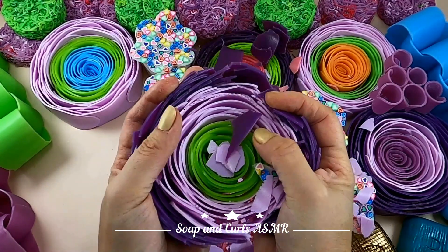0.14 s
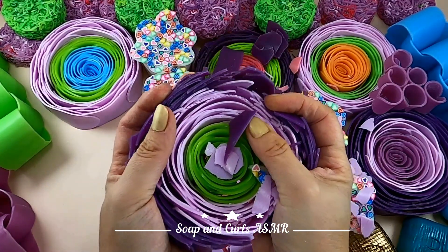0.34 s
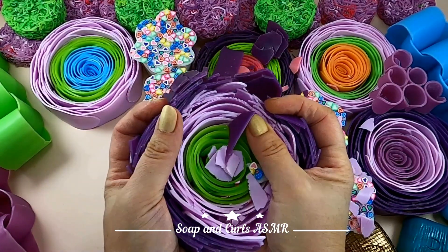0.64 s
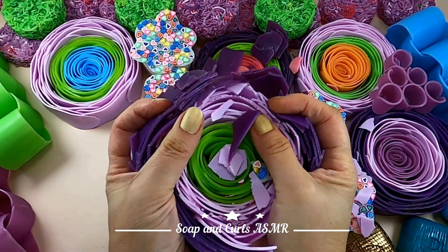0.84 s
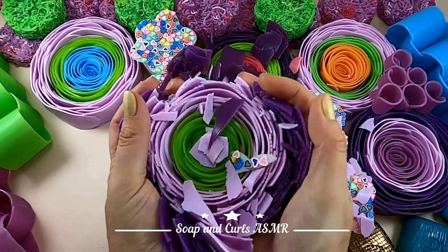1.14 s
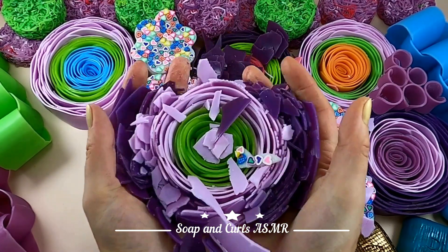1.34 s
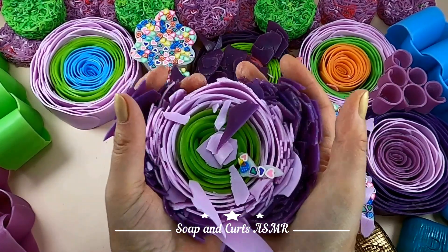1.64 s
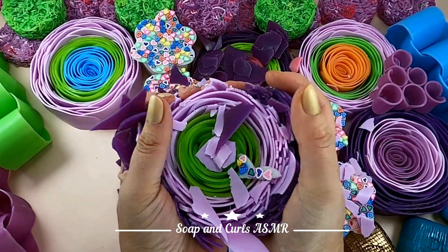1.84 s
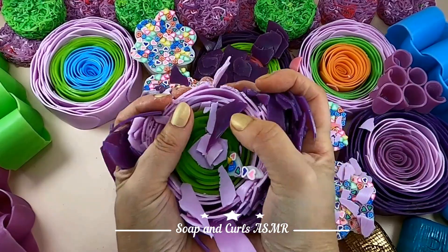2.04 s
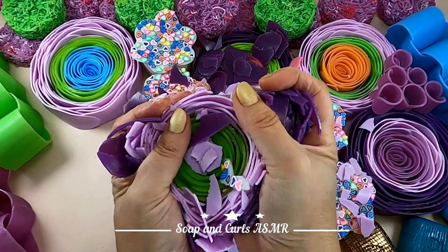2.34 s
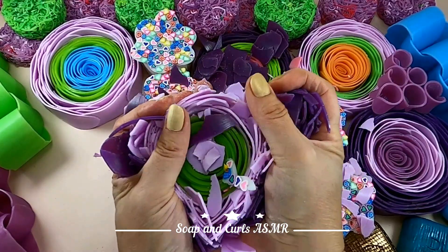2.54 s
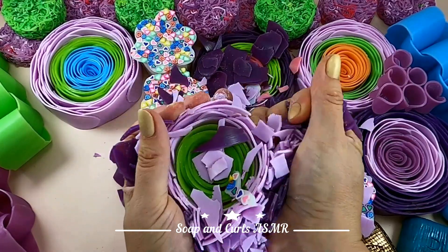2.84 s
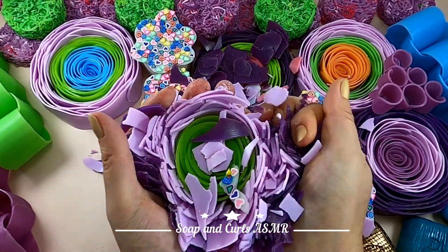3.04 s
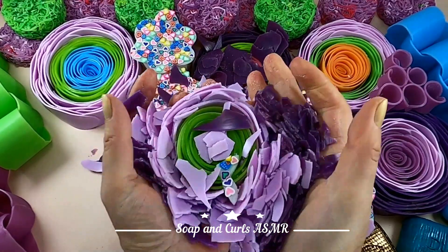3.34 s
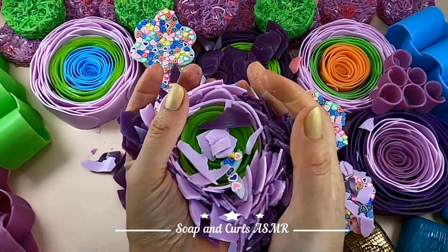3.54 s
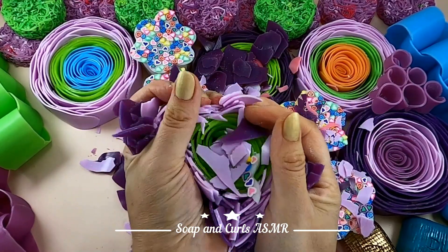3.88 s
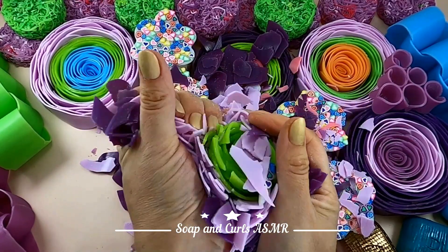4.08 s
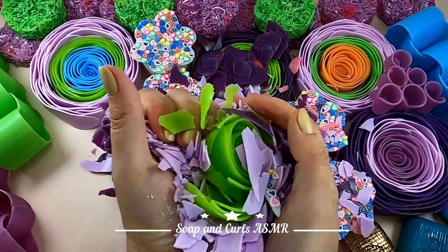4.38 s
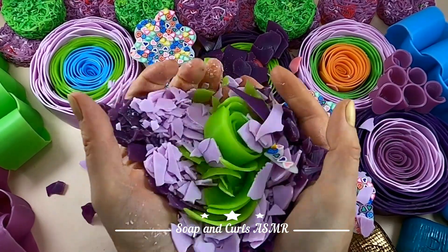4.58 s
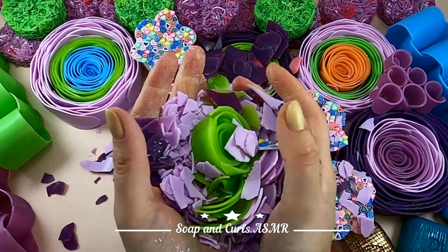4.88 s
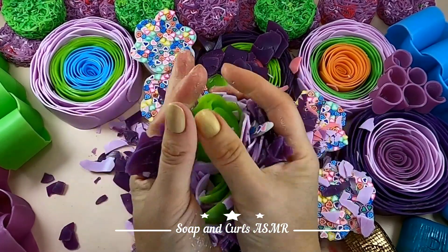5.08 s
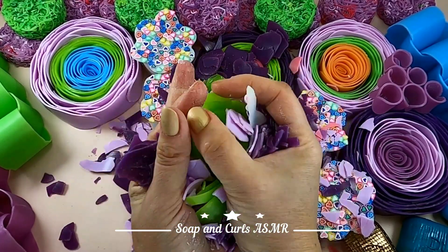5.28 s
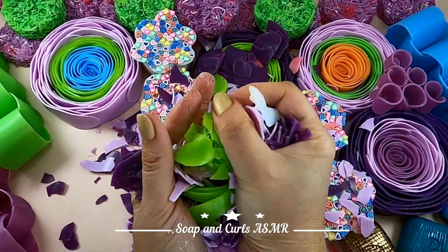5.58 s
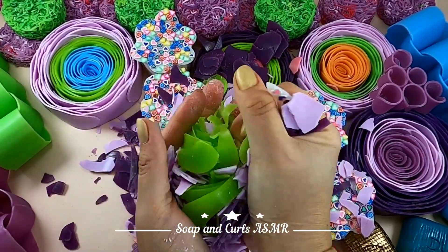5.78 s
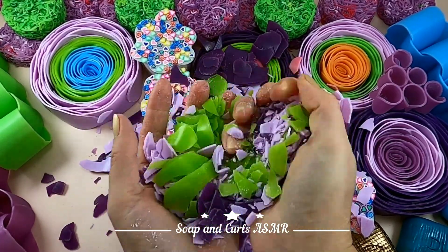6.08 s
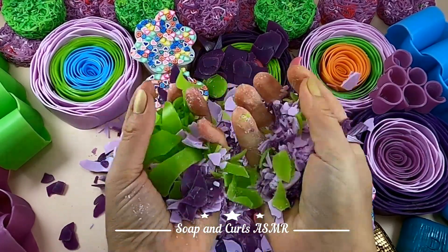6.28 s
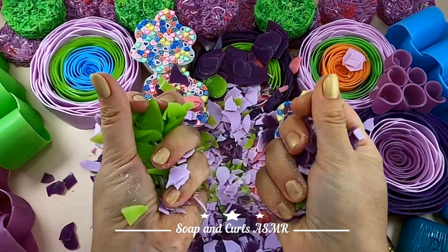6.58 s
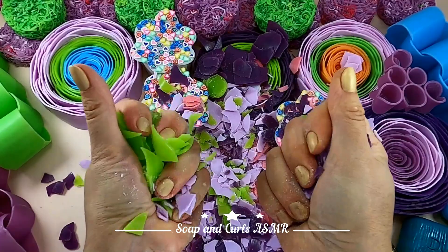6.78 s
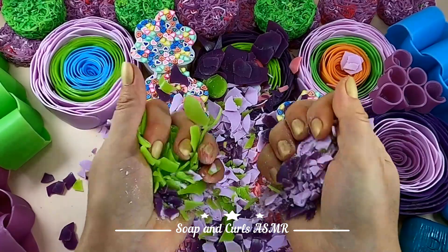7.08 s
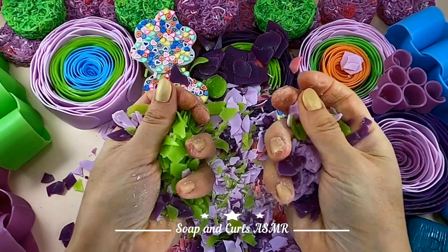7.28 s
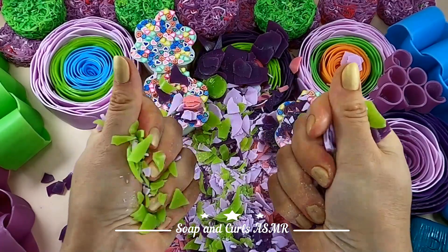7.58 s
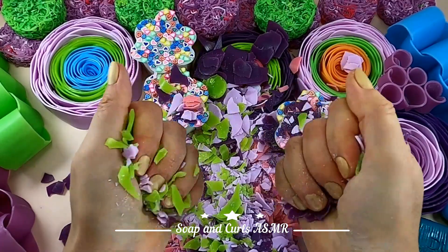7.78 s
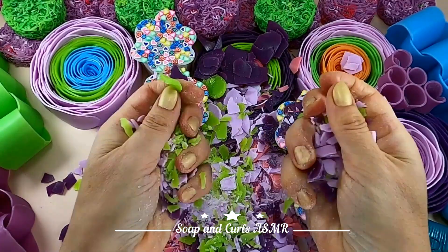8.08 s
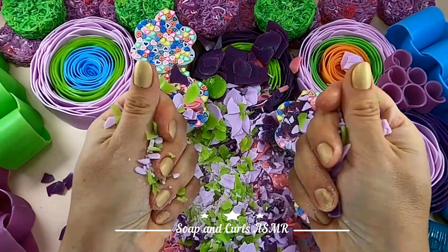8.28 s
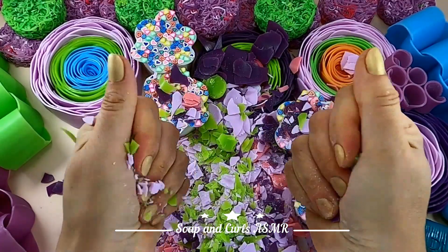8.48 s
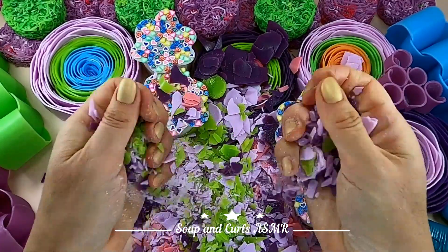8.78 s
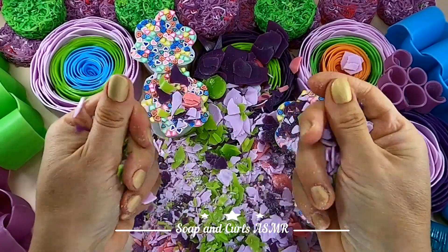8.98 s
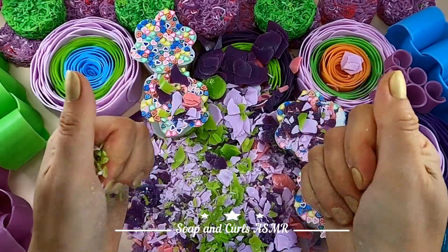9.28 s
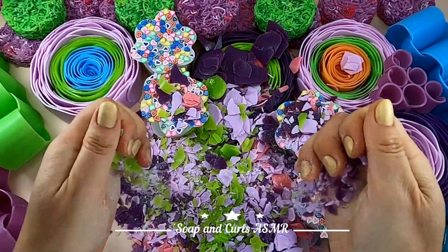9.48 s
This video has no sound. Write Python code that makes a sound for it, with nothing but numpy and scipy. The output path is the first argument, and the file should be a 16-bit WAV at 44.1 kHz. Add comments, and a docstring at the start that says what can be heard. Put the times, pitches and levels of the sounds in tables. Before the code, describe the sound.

Bare hands squeeze brittle soap shells right at the microphone. It starts at once with loud crisp cracks, continues as crunchy pulses with brief lulls, and spills of flakes patter and tap woodenly on the tabletop. After further strong bursts, thicker pieces give lower, woody cracks; the crunching then dwindles to light crumbling and a few ticks. Short dry room reflections, wide stereo detail, soft steady background hiss.

```python
"""From the start two hands crush a rose of dry soap curls close to a stereo microphone: thin shells snap
one by one as damped resonators, over a crackle of random tiny fractures. As the grip opens, loose flakes
clatter and knock on the table, whose modes ring on. Later, runs of woody cracks come from the thick curls,
and the work thins out and fades. Throughout, a small room answers by decaying echoes over quiet shaped hiss."""
import sys
import numpy as np
from scipy import signal
from scipy.fft import rfft, irfft
from scipy.io import wavfile
from scipy.ndimage import uniform_filter1d, minimum_filter1d

SR = 44100
rng = np.random.default_rng(int(sys.argv[2]) if len(sys.argv) > 2 else 0)


def dump_mix(stems):
    """Bounce the given channels to the path in sys.argv[1] as a 16-bit WAV at rate SR."""
    frames = np.atleast_2d(stems).T  # one column per channel
    limited = np.clip(frames, -1, 1)  # hard clip at full scale
    pcm = np.round(limited * 32767).astype(np.int16)
    wavfile.write(sys.argv[1], SR, pcm)


N = 424683
TIME = np.arange(N) / SR
TAPS = 1024  # length of one piece's sound, samples
HZ = np.fft.rfftfreq(TAPS, 1 / SR) + 1  # 1 Hz up, so that no ratio divides by zero
MS = SR / 1000  # samples in a millisecond


def amp(db):
    """Level to amplitude: 20 dB is a factor of ten."""
    return 10 ** (np.asarray(db) / 20)


def power_db(power):
    """Power to level: 10 dB is a factor of ten."""
    return 10 * np.log10(power)


def read(points, hz):
    """Interpolates a spectrum table on a logarithmic frequency axis."""
    f, value = np.transpose(points)
    return np.interp(np.log(hz + 1), np.log(f), value)


def unit(x):
    """Energy normalisation: a stereo sound gets mean energy 1 a channel."""
    return x / np.sqrt(np.sum(x ** 2) / 2 + 1e-20)


def add(mix, s, sound):
    """Superposition: mixes a sound in at time s."""
    part = mix[:, max(round(s * SR), 0):][:, :sound.shape[1]]
    part += sound[:, :part.shape[1]]


def causal(points):
    """Minimum phase: the response of this colour that starts sharply and rings afterwards."""
    log_gain = np.log(amp(read(points, HZ)))
    circle = np.concatenate([log_gain, log_gain[-2:0:-1]])
    return np.exp(np.conj(signal.hilbert(circle)))[:len(HZ)]


def ports(a, b, alike_hz, most=0.72):
    """Diffuse-field coherence: two close ports hear alike in the bass and differently in the treble."""
    alike = most / (1 + (np.fft.rfftfreq(len(a), 1 / SR) / alike_hz) ** 2)
    mid = rfft(a) * np.sqrt(1 + alike)
    side = rfft(b) * np.sqrt(1 - alike)
    return irfft(np.array([mid + side, mid - side]), len(a))


# still air and microphone hiss: f/Hz, relative level/dB
AIR_SPECTRUM = [(15, -4), (40, -29), (230, -24.5), (400, -7.5), (1000, -5), (3000, -2), (8000, -8.5),
                (16000, -22)]


def air():
    """Stationary noise floor of room and microphone: white noise shaped by a spectrum."""
    noise = rfft(ports(*rng.standard_normal((2, N)), alike_hz=2500, most=0.25))
    shaped = irfft(noise * amp(read(AIR_SPECTRUM, np.fft.rfftfreq(N, 1 / SR))), N)
    return amp(-56.5) * np.sqrt(N) * unit(shaped)


def handling(power):
    """Amplitude modulation: low-passed noise rumbles softly with the work of the hands."""
    low_pass = signal.butter(1, 30, fs=SR, output="sos")
    rumble = signal.sosfilt(low_pass, ports(*rng.standard_normal((2, N)), alike_hz=2500))
    return amp(-53.0) * np.sqrt(N * power) * unit(rumble)


# decay of the late room sound: f/Hz, t60/s
ROOM_DECAY = [(300, 0.063), (1000, 0.49), (4000, 0.3), (9000, 0.16), (16000, 0.018)]


def echoes(tail_db=-12, bass_db=5):
    """Reverberation: quick sparse reflections off nearby things, then a short tail fuller in the bass."""
    early_db, early_s = -14.5, .0055
    size = SR // 2
    t = np.arange(size) / SR
    taps = rng.standard_normal((2, size)) * (rng.random((2, size)) < 4000 / SR)
    early = unit(ports(*taps, alike_hz=4800) * np.exp(-t / early_s) * (t > .002))
    # each band of the tail decays at its own rate
    hz, when, bands = signal.stft(ports(*rng.standard_normal((2, size)), alike_hz=3600), SR, nperseg=256)
    bass_lift_db = bass_db / (1 + (hz[:, None] / 600) ** 2)
    tail_gain = amp(bass_lift_db - 60 * when / read(ROOM_DECAY, hz)[:, None])
    tail = signal.istft(bands * tail_gain, SR, nperseg=256)[1][:, :size]
    return amp(early_db) * early + amp(tail_db) * unit(tail * np.clip(t / 0.00022 - .5, 0, 1))


def room(x, count=4):
    """Time-varying convolution: pieces break at ever different places, so the echo pattern changes."""
    step = SR // 150  # samples from one place to the next
    places = rng.integers(0, count, N // step + 2)
    out = 0
    for k in range(count):
        share = np.interp(np.arange(N) / step, np.arange(len(places)), places == k)
        out = out + signal.oaconvolve(x * np.sin(np.pi / 2 * share), echoes(), axes=1)[:, :N]
    return out


# modes of the table under the heap: f/Hz, relative level at resonance/dB, t60/s
TABLE_MODES = [(306, 2, 0.11), (378, 5, 0.096), (398, 5.5, 0.13), (421.5, 11, 0.22), (504, 8, 0.23),
               (605, 10.5, 0.095), (679.5, 7.5, 0.22), (750, 8.5, 0.19), (1030, 2, 0.0071)]


def table_top(x):
    """Modal resonance: the table rings on as a sum of decaying cosines driven by the sound."""
    t = np.arange(SR // 3) / SR
    ring = np.zeros(len(t))
    for hz, db, t60 in TABLE_MODES:
        even_peak = 2 * np.log(1000) / (t60 * SR)  # makes the resonant gain independent of t60
        ring += amp(db - 60 * t / t60) * np.cos(2 * np.pi * hz * t) * even_peak
    return amp(-3.0) * signal.oaconvolve(x, ring[None], axes=1)[:, :N]


def shell(hz, q, ringing, count=3):
    """Damped resonance: a broad double resonator with a few narrow modes scattered around it."""
    mode_q, rattle = 13, .045
    mode_hz = hz * np.exp(0.25 / max(q, .7) * rng.uniform(-1.203, 1, (count, 1)))
    modes = rng.choice([-1, 1], (count, 1)) / (1 + 1j * mode_q * (HZ / mode_hz - mode_hz / HZ))
    broad = 1 / (1 + 1j * q * (HZ / hz - hz / HZ)) ** 2
    return broad + ringing * modes.sum(0) + rattle


def chip(colour, hz, q, ringing, steps_ms, scatter, scatter_ms, count=7):
    """Multipath: a piece cracks in quick steps, rings, and bounces between fingers and flakes to the ports."""
    pan_db, lag_ms, place_ms, angle_ms = -0.5, 0.037, 0.026, 0.034
    # smaller steps come just before and after the main break, weaker bounces later
    steps = rng.uniform(0, 2 * steps_ms, count)
    bounces = 2 * steps_ms + rng.exponential(scatter_ms, count)
    delay_ms = 0.19 + np.r_[steps_ms, steps, bounces]
    step_size, bounce_size = rng.standard_normal((2, count)) / np.sqrt(count)
    size = np.r_[.58, step_size, scatter * bounce_size]
    # the right port is usually a little nearer; each bounce comes from its own direction
    turn = np.r_[np.zeros(count + 1), angle_ms * rng.standard_normal(count)]
    lag = lag_ms + place_ms * rng.standard_normal() + turn
    arrival_s = (delay_ms + np.array([lag, -lag]) / 2) * MS / SR
    paths = np.sum(size[:, None] * np.exp(-2j * np.pi * arrival_s[..., None] * HZ), 1)
    # only the treble is shaded by the microphone's body, mostly on the left
    shade_db = (pan_db * rng.standard_normal() + 1.5) * np.minimum(HZ / 6200, 1.6) ** 2
    shading = amp(np.array([-shade_db, shade_db]) / 2)
    sound = irfft(colour * shell(hz, q, ringing) * paths * shading)
    return unit(sound * np.clip(np.linspace(4, 0, TAPS), 0, 1))


def chips(low_hz, high_hz, count, colour, **settings):
    """Size sets pitch: a stock of pieces spaced evenly in log frequency."""
    return [chip(colour, hz, **settings) for hz in np.geomspace(low_hz, high_hz, count)]


def shower(pieces, per_s, spread_db, level_db):
    """Poisson process: random small pieces of mixed size; harder work makes them more and louder."""
    power = amp(level_db) ** 2
    rate = per_s * (power / power.mean()) ** .36
    at = np.flatnonzero(rng.random(N) < rate / SR)
    luck, sign, pitch = rng.random((3, N))
    size = amp(spread_db * np.minimum(-np.log(1 - luck[at]), 3.5))
    energy = np.zeros(N)
    energy[at] = size ** 2
    # the work done in each moment is shared among the pieces that break in it
    size *= np.sqrt(power[at] / uniform_filter1d(energy, size=3000)[at]) * np.sign(sign[at] - .5)
    choice = (pitch * len(pieces)).astype(int)
    out = np.zeros((2, N + TAPS))
    for i, a in zip(at, size):
        out[:, i:i + TAPS] += a * pieces[choice[i]]
    return out[:, :N]


def stroke(start, hold, db, swell_db, attack_s, release_db_per_s):
    """Envelope of one gesture's power: linear attack in amplitude, swelling or sagging hold, dB release."""
    t = np.arange(0, hold + .5, 1 / SR)
    level_db = db + swell_db * np.minimum(t / hold, 1) - release_db_per_s * np.maximum(t - hold, 0)
    power = np.zeros((1, N))
    add(power, start, (np.minimum(t / attack_s, 1) * amp(level_db))[None] ** 2)
    return power[0]


# loose flakes spilling from the fingers: start t/s, hold t/s, drive level/dB
SPILLS = [(0.088, 0.047, -38.5), (0.207, .11, -44.5), (1.135, 0.27, -37.5), (1.408, 0.19, -37.5),
          (1.663, 0.08, -38), (1.963, 0.33, -50.5), (2.233, 0.074, -41.5), (2.935, 0.083, -35),
          (3.05, 0.05, -40.5), (3.318, 0.14, -44), (3.457, 0.27, -38), (4.198, 0.22, -48),
          (4.529, 0.065, -37.5), (4.695, 0.19, -40.5), (4.95, 0.77, -48.5), (5.37, 0.4, -46),
          (6.054, 0.055, -36), (6.319, 0.39, -42.5), (6.889, 0.017, -41), (7.143, 0.057, -38.5),
          (7.384, 0.14, -41), (7.582, 0.2, -46), (8.021, 0.13, -44.5), (8.472, 0.049, -46),
          (8.834, 0.24, -49), (9.143, 0.11, -53.5), (9.574, .05, -44)]
TIP_S, SETTLE_DB_PER_S, THINNING_DB = 0.0084, 103.5, -1.5  # a spill starts fast, thins a little, settles
SHED_DB = -27  # flakes shed by crushing, relative to its power
STIR_DB, STIR_DB_PER_S = -31.5, 336  # clatter set off by a knock, relative to its table level; its fall


def spilling(crushed):
    """Power addition: flakes shed by crushing, spilled from the fingers and stirred by knocks."""
    power = amp(SHED_DB) ** 2 * crushed
    for start, hold, db in SPILLS:
        power = power + stroke(start, hold, db, THINNING_DB, TIP_S, SETTLE_DB_PER_S)
    for s, db, _ in KNOCKS:
        power = power + stroke(s, 0.024, db + STIR_DB, 0, 0.0014, STIR_DB_PER_S)
    return power


# colour of a flake landing: f/Hz, relative level/dB
LANDING = [(100, 10), (240, -21), (300, -21), (380, -7), (650, -6), (1000, -0.5), (1350, 0.5), (2500, 15.5),
           (8000, -25)]


def flakes(power, count=50):
    """Impact excitation: loose pieces tap dull and hollow, a few curls ring, and the heap shifts under them."""
    colour, level_db = causal(LANDING), power_db(power)
    pieces = chips(400, 1120, count, colour, q=0.79, ringing=0.59, steps_ms=1.571,
                   scatter=0.79, scatter_ms=1.903)
    curls = chips(760, 1200, count, colour, q=2.65, ringing=0.17, steps_ms=1.07,
                  scatter=0.28, scatter_ms=2.35)
    taps = shower(pieces, per_s=260, spread_db=6.0, level_db=level_db)
    rings = shower(curls, per_s=50, spread_db=0.0, level_db=level_db)
    # the heap answers with its lowest pieces, even to a light touch
    heap = shower(pieces[:count // 3], per_s=560, spread_db=2, level_db=0.84 * level_db)
    return amp(-11.0) * taps + amp(-15.5) * rings + amp(-30.0) * heap


# larger flakes knocking on the heap and the table:
# t/s, relative level/dB (of the energy packed into 1 ms), f/Hz
KNOCKS = [(.090, -25, 744), (.097, -17.5, 754), (0.28, -27.5, 410), (0.4633, -18, 1030), (.65, -23.5, 1043),
          (0.904, -26.5, 1024), (1.139, -20, 930), (1.173, -27, 1010), (1.185, -18.5, 970),
          (1.247, -16, 950), (1.324, -20, 790), (1.418, -12, 760), (1.429, -19.5, 704), (1.441, -24, 734),
          (1.461, -23.5, 790), (1.48, -26, 785), (1.487, -16.5, 834), (1.501, -18.5, 790),
          (1.514, -22, 810), (1.584, -18.5, 1010), (1.6731, -14, 954), (2.444, -24.5, 1014),
          (2.928, -24, 740), (2.947, -31, 600), (2.964, -20.5, 432), (2.985, -19.5, 950), (3.028, -30, 750),
          (3.479, -19, 1000), (3.528, -18.5, 960), (3.568, -28, 1080), (3.609, -24, 830),
          (3.627, -18.5, 900), (3.646, -17.5, 995), (4.585, -20, 920), (4.666, -30, 580),
          (4.855, -19, 1180), (4.856, -26, 450), (5.203, -26, 1030), (5.209, -26, 1180), (5.387, -18, 1030),
          (5.432, -25, 1040), (5.517, -13, 1050), (5.523, -21, 1010), (6.072, -24.5, 595),
          (6.337, -17.5, 1120), (6.345, -23.5, 437), (6.345, -18.5, 940), (6.371, -25, 1080),
          (6.389, -17.5, 974), (6.432, -22, 965), (6.477, -25, 1060), (6.518, -17.5, 983),
          (6.603, -19, 1075), (6.6094, -13.5, 956), (7.158, -30.5, 613), (7.387, -18, 900),
          (7.456, -23.5, 1030), (8.039, -22.5, 927), (8.332, -31, 960), (8.488, -16, 880),
          (8.503, -19, 1150), (8.838, -35.5, 940), (9.355, -31, 1390)]
# knocks near the pitch of the cupped palms ring longer
PALM_HZ, PALM_WIDTH_HZ, DULL_Q, PALM_Q = 1000, 83, 1.54, 3.7


def knocks():
    """Coupled resonance: larger flakes knock one by one, with more Q near the pitch of the palms."""
    out, colour = np.zeros((2, N)), causal(LANDING)
    for s, db, hz in KNOCKS:
        palm = np.exp(-((hz - PALM_HZ) / PALM_WIDTH_HZ) ** 2)
        q = rng.uniform(1.0, 1.32) * (DULL_Q + PALM_Q * palm)
        knock = chip(colour, hz, q, ringing=0.13, steps_ms=0.98, scatter=0.48, scatter_ms=2.277)
        add(out, s - .0015, amp(db - 6.0) * np.sqrt(MS) * knock)
    return out


# colour of a fracture: f/Hz, relative level/dB
FRACTURE = [(150, -63), (350, -35), (700, -14.5), (1000, -4), (1350, -3.5), (1900, 1.5), (4000, 0),
            (7000, 0.5), (8500, -2.5), (12000, -7), (16000, -14)]
# thick curls giving way in a run of woody cracks: start t/s, hold t/s, drive level/dB
THICK_RUNS = [(5.775, .08, -47), (5.888, 0.097, -46.5), (6.9, 0.15, -45.5), (7.674, 0.26, -51)]
PRESS_S, RELAX_DB_PER_S = 0.0025, 134  # a squeeze bites quickly and lets go slowly


def thick_walls(count=40):
    """Higher-Q resonance: thick curls give runs of woody cracks drawn from a narrow band of pitches."""
    pieces = chips(1600, 2080, count, causal(FRACTURE), q=3.0, ringing=0.13, steps_ms=0.48,
                   scatter=0.2, scatter_ms=1.8)
    power = 1e-12
    for start, hold, db in THICK_RUNS:
        power = power + stroke(start, hold, db, 0, PRESS_S, RELAX_DB_PER_S * 2)
    return shower(pieces, per_s=110, spread_db=6, level_db=power_db(power))


def clumps(swing_db=2.5, step_s=0.007):
    """Clustering: one fracture sets off its neighbours, rendered as a quick random swing in dB."""
    return swing_db * np.interp(TIME / step_s, np.arange(4000), rng.standard_normal(4000))


# faint creak of the soap resting in the hands, less as they empty: t/s, drive level/dB
RESTING = [(0, -46), (6.299, -49), (8, -48.5), (9.3, -57), (9.5, -57)]
# squeezes of the hands: start t/s, hold t/s, drive level/dB, swell over the hold/dB,
# level of fine over coarse fractures/dB
SQUEEZES = [(0, 0.088, -25.5, -8, 4.5), (0.09, 0.27, -37, -13.5, -22), (0.463, 0.059, -38, -4, 7),
            (0.64, 0.24, -35, -10.5, 14), (0.897, 0.23, -34.5, 1.5, 0), (1.124, 0.25, -28.5, -11, -18.5),
            (1.402, 0.38, -32, -6.5, -9), (1.972, 0.22, -40.5, 2.5, -1.5), (2.259, 0.29, -26, -10, 1),
            (2.73, 0.27, -37.5, 1.5, 4), (2.938, 0.24, -33.5, -2.5, 1.5), (3.346, 0.32, -37, 2.5, 0.5),
            (3.878, 0.016, -31.5, -5, 14), (3.978, 0.23, -36.5, 5.5, 0), (4.31, 0.11, -38, -4, -2),
            (4.537, 0.032, -34.5, 2.5, -24), (4.683, 0.18, -40.5, 7, 4), (4.959, 0.026, -35.5, -7, -6.5),
            (5.148, 0.173, -40.5, -4.5, -28), (5.369, 0.14, -39.5, 12.5, 1), (5.576, 0.39, -33.5, -5, 4),
            (6.066, 0.054, -32.5, -2, -8), (6.318, 0.32, -36.5, -2, -4), (6.644, 0.29, -37.5, 9.5, 6.5),
            (7.013, 0.21, -35, -4.5, 16), (7.299, 0.032, -39, -1, 14), (7.358, 0.39, -36, -1.5, -3),
            (8.016, 0.36, -36.5, -15, 19), (8.358, 0.094, -45, 1.5, -3), (8.484, 0.022, -45, -20, -18),
            (8.827, 0.48, -44, -5.5, 10), (9.561, 0.077, -42.5, -9, -2.5)]
# drive set off by a snap of 0 dB, its dB per dB of snap, its fall
DEBRIS_DB, DEBRIS_GROWTH, DEBRIS_DB_PER_S = -29.5, 0.74, 495
STRAIN_S = 0.0039  # tiny fractures build up just before a shell gives way


def crushing():
    """Energy partition: squeezes, strain and debris share their power between coarse and fine fractures."""
    resting = amp(np.interp(TIME, *np.transpose(RESTING))) ** 2
    coarse, fine = resting / 2, resting / 2
    for start, hold, db, swell_db, fine_db in SQUEEZES:
        power = stroke(start, hold, db, swell_db, PRESS_S, RELAX_DB_PER_S)
        share = 1 / (1 + amp(-fine_db) ** 2)
        coarse, fine = coarse + (1 - share) * power, fine + share * power
    for s, db, hz, _ in SNAPS:
        debris_db = DEBRIS_DB + DEBRIS_GROWTH * db
        power = stroke(s - STRAIN_S, 0.0065, debris_db, 0, 0.001, DEBRIS_DB_PER_S)
        share = 1 / (1 + (3600 / hz) ** 3)  # high-pitched shells leave finer debris
        coarse, fine = coarse + (1 - share) * power, fine + share * power
    clumping = amp(clumps()) ** 2
    return coarse * clumping, fine * clumping


def crackle(coarse_power, fine_power, count=130):
    """Crackling noise: coarse crumbs grind and fine edges splinter as many random microfractures."""
    colour, level_db = causal(FRACTURE), power_db(coarse_power + fine_power)
    crumbs = chips(1680, 3500, count, colour, q=0.78, ringing=0.47, steps_ms=0.422,
                   scatter=0.73, scatter_ms=0.96)
    edges = chips(3600, 8500, count, colour, q=1.0, ringing=.55, steps_ms=.4,
                  scatter=.6, scatter_ms=.8)
    shards = chips(1700, 7500, count, colour, q=1.1, ringing=1.0, steps_ms=0.35,
                   scatter=1.0, scatter_ms=0.9)
    coarse = shower(crumbs, per_s=170, spread_db=4.0, level_db=power_db(coarse_power))
    fine = shower(edges, per_s=230, spread_db=4.5, level_db=power_db(fine_power))
    # small shards snap clear of the rest, less often
    small = shower(shards, per_s=60, spread_db=1.5, level_db=level_db)
    # soap powder rubbing on skin makes a finer, even rustle beneath the ticks
    powder = shower(crumbs[::2] + edges, per_s=2500, spread_db=3, level_db=level_db)
    return amp(-7.0) * coarse + amp(-5.0) * fine + amp(-11.0) * small + amp(-11.0) * powder


# whole shells breaking: t/s, relative level/dB (of the energy packed into 1 ms), f/Hz, ring Q
SNAPS = [(0.017, -16, 5000, 1.5), (0.025, -7, 5000, 0.37), (0.042, -14.5, 5240, 1.4),
         (0.067, -16, 4900, 0.63), (0.0747, -16, 3770, 0.46), (0.086, -16, 4450, 1.6),
         (0.1323, -16.5, 4030, 4.1), (0.144, -19.5, 3800, 0.78), (0.1629, -8, 3600, 0.73),
         (0.169, -16, 3940, 1.4), (0.1735, -17.5, 4000, 2), (0.209, -23, 2070, 1.4),
         (.252, -13.5, 3520, 0.69), (0.3596, -11.5, 4280, 0.62), (0.3935, -26, 5900, 1.3),
         (0.4615, -13.5, 2840, 0.27), (0.4766, -10.5, 5200, 1), (0.523, -22, 4000, 2.7),
         (0.532, -14, 4300, 0.75), (0.5547, -24, 4500, 0.52), (0.585, -14.5, 6000, 0.38),
         (0.5921, -21, 2960, 0.42), (0.629, -16, 3200, 0.84), (0.6576, -12, 4000, 0.49),
         (0.669, -16.5, 3500, 0.5), (0.6738, -15, 3370, 0.59), (0.693, -21.5, 5250, 0.38),
         (.705, -23, 5550, 1), (.748, -16, 4870, 0.51), (.7545, -24, 4900, 1.1), (.7648, -23, 4800, 0.55),
         (0.778, -14.5, 3700, 1.2), (0.846, -12.5, 5200, 0.54), (0.906, -17.5, 4000, 0.48),
         (0.912, -17.5, 3600, 0.98), (.935, -22.5, 3050, 1), (0.962, -20, 4200, 1.5),
         (0.995, -21, 3950, 0.75), (1.011, -15, 2500, 0.6), (1.0185, -17.5, 4120, 1.3),
         (1.069, -13, 7600, 0.4), (1.133, -14, 4600, 0.47), (1.148, -17, 5430, 1.3),
         (1.193, -20, 4000, 1.6), (1.237, -14, 2240, 1.6), (1.324, -23, 3040, 0.54),
         (1.413, -16.5, 2100, 0.61), (1.5372, -18.5, 2120, 0.29), (1.545, -21.5, 4100, .8),
         (1.565, -18, 3900, 0.8), (1.605, -21, 3920, 1.1), (1.676, -24.5, 2500, 0.99),
         (1.753, -12, 2500, 0.43), (1.754, -19.5, 2750, 2.3), (1.875, -25, 5000, 0.73),
         (1.945, -23, 3320, 0.87), (1.9868, -9.5, 4400, 0.28), (1.9993, -14.5, 4330, 0.57),
         (2.0164, -16, 4960, 0.75), (2.082, -17.5, 5370, 0.84), (2.095, -17.5, 6400, 5.5),
         (2.174, -19, 11200, 0.41), (2.2151, -22.5, 3100, 0.6), (2.2508, -22.5, 3980, 1),
         (2.28, -16, 3400, 1.3), (2.34, -17, 3550, 0.9), (2.3483, -14, 3600, 0.91),
         (2.365, -21.5, 4100, 0.88), (2.381, -19.5, 5000, 2.5), (2.4311, -15.5, 3800, 0.95),
         (2.442, -18, 4140, 0.52), (2.481, -21.5, 5160, 0.2), (2.4983, -28, 4500, 0.55),
         (2.5299, -15.5, 4800, 0.19), (2.576, -21, 3600, 0.86), (2.5804, -20, 2620, 0.91),
         (2.595, -25, 3200, 0.75), (2.6428, -22, 4800, 0.33), (2.672, -20.5, 4800, 0.35),
         (2.691, -29, 4380, 0.32), (2.7201, -17.5, 2400, 0.36), (2.7427, -21, 4970, 0.32),
         (2.751, -27.5, 3550, 0.37), (2.787, -23, 6200, 1.3), (2.7972, -25.5, 3950, 0.48),
         (2.829, -16, 4100, 0.58), (2.847, -12.5, 3960, 0.45), (2.8683, -20, 2620, 0.79),
         (2.9182, -22.5, 4130, 0.34), (2.93, -20.5, 2530, 0.6), (2.946, -23, 4030, .5),
         (2.961, -22, 4500, 1.2), (3.029, -22, 3600, 0.42), (3.0762, -18.5, 2670, 0.89),
         (3.1307, -16, 4200, 0.38), (3.2413, -35, 3600, .8), (3.381, -30, 4720, 0.7),
         (3.414, -29.5, 2770, 3.9), (3.478, -21.5, 2250, 0.13), (3.6469, -24, 2650, 1.7),
         (3.679, -27.5, 3220, 1.4), (3.7276, -23, 3600, 0.58), (3.857, -31.5, 3670, 1.1),
         (3.8981, -22.5, 2500, 0.32), (3.9652, -23, 2900, 1.9), (3.98, -10, 6800, 1.7),
         (4.021, -6.5, 6350, 2.2), (4.0313, -13.5, 5260, 0.68), (4.0413, -14, 4670, 0.5),
         (4.068, -16.5, 5400, 0.53), (4.083, -15.5, 3160, 0.38), (4.099, -18, 5400, 0.39),
         (4.12, -18.5, 5930, 1.2), (4.194, -13.5, 6560, 0.82), (4.2122, -18, 4380, 0.34),
         (4.42, -19.5, 3100, 0.31), (4.5452, -21.5, 3170, 1.5), (4.5697, -18, 3670, 2),
         (4.666, -20, 2140, 0.45), (4.697, -14, 3090, 7.6), (4.77, -23, 2320, 0.53),
         (4.803, -22.5, 3660, 1.5), (4.827, -18.5, 5200, 0.75), (4.829, -17, 3250, 1.3),
         (5.0037, -29, 3830, 0.57), (5.136, -27, 2770, 6.9), (5.3865, -18, 2220, 1.6),
         (5.463, -9, 5000, 0.8), (5.469, -24, 4930, 0.58), (5.479, -16.5, 4000, 0.46),
         (5.4823, -17.5, 4670, 0.67), (5.494, -12, 3700, 2.4), (5.531, -14, 5430, 0.43),
         (5.5383, -16, 4000, .7), (5.553, -16.5, 5840, 0.92), (5.581, -20, 4650, 0.54),
         (5.606, -23.5, 4200, 1.1), (5.627, -22.5, 4400, 0.99), (5.6453, -20, 3790, 0.42),
         (5.713, -20.5, 4470, 0.32), (5.725, -21.5, 3770, 2.1), (5.739, -21, 4700, 0.28),
         (5.7465, -18.5, 2500, 0.45), (5.778, -18, 3420, 0.22), (5.8223, -21, 1820, 0.64),
         (5.8448, -15.5, 2000, 0.62), (5.9058, -24, 1950, 0.64), (5.912, -20.5, 1920, 0.89),
         (5.917, -21, 1800, 1.7), (5.9329, -17.5, 1850, 2.5), (5.9436, -28, 1850, 2.7),
         (5.982, -19.5, 2480, 0.33), (6.0041, -30, 3030, 0.95), (6.0584, -33, 3300, 1),
         (6.073, -19, 3950, 0.37), (6.079, -19, 3540, 0.88), (6.322, -13, 5150, 1.5),
         (6.361, -21.5, 2680, 2.8), (6.3867, -24, 2500, 3), (6.49, -21, 5600, 0.8), (6.55, -16, 7000, 1.1),
         (6.6188, -24.5, 2600, 1.8), (6.6405, -20.5, 5500, 0.59), (6.678, -21, 4500, 0.19),
         (6.6849, -16.5, 3340, 0.6), (6.692, -18.5, 7300, 0.72), (6.716, -18, 2970, 0.92),
         (6.7333, -17.5, 4170, 0.34), (6.772, -20.5, 4140, 0.39), (6.78, -14.5, 4730, 0.53),
         (6.8028, -20.5, 5170, 3), (6.8416, -17.5, 2610, 0.43), (6.8551, -17, 5070, 0.73),
         (6.86, -18.5, 4750, 1.4), (6.889, -17, 4180, 0.96), (6.9376, -21, 1840, 0.65),
         (6.964, -20.5, 4980, 0.78), (7.03, -23, 1740, 1.4), (7.1023, -24, 5300, 1.04),
         (7.16, -22.5, 4650, 1.5), (7.1879, -24, 4750, 1.1), (7.2276, -21.5, 6500, .6),
         (7.3844, -16, 1900, 1), (7.674, -20.5, 3120, 0.43), (7.7747, -26.5, 4630, 1.1),
         (7.8106, -26, 3930, 0.29), (7.8355, -28, 1950, 0.7), (7.847, -23, 1790, 0.27),
         (7.907, -30.5, 7040, 0.24), (7.985, -26.5, 2750, 1.1), (8.0383, -15.5, 2400, 1.3),
         (8.316, -35.5, 6400, 1.5), (8.334, -29.5, 3480, 0.48), (8.371, -24.5, 1780, 0.26),
         (8.4865, -27, 1630, 0.82), (8.502, -17, 3970, 2.7), (8.539, -20, 1880, .8),
         (8.639, -32.5, 1410, 1.7), (8.692, -34.5, 3360, 0.63), (8.7403, -24, 8100, 0.91),
         (8.778, -32.5, 2920, 0.64), (8.8103, -39, 4600, 1), (8.84, -27.5, 3140, 0.32),
         (8.8673, -30.5, 5940, 0.96), (8.965, -37, 4260, 1), (9.0432, -30, 4800, 1.7),
         (9.1373, -28, 2500, 0.18), (9.2282, -30, 7900, 1.2), (9.284, -31.5, 2180, 1.2),
         (9.3448, -30, 1900, 0.38), (9.5194, -31.5, 9700, 1.1), (9.545, -41, 5000, 1.3),
         (9.614, -23.5, 7050, 0.63)]


def snaps():
    """Brittle fracture: each shell gives one sharp crack; a bigger break takes longer to run through."""
    out, colour = np.zeros((2, N)), causal(FRACTURE)
    for s, db, hz, q in SNAPS:
        run_ms = .85 * amp(.4 * (db + 21))
        crack = chip(colour, hz, q, ringing=.62, steps_ms=run_ms, scatter=.55, scatter_ms=.8)
        add(out, s - .0007, amp(db) * np.sqrt(MS) * crack)
    return amp(-1.42) * out


def scene():
    """Superposition and radiation: soap, table and room sum; such small pieces radiate almost no bass."""
    coarse, fine = crushing()
    spilled = spilling(coarse + fine)
    soap = snaps() + crackle(coarse, fine) + thick_walls() + flakes(spilled)
    knocked = knocks()
    ring = table_top(soap + knocked)
    # the hands shield the knocks from the room
    answer = room(soap + ring + amp(-7) * knocked)
    no_bass = signal.butter(4, 270, "highpass", fs=SR, output="sos")
    heard = signal.sosfilt(no_bass, soap + knocked + ring + answer)
    return heard + handling(coarse + spilled) + air()


def record(dry):
    """Peak limiting: a quick smoothed gain holds down the tallest cracks; then a 16 kHz low-pass."""
    ceiling = .34
    gain = np.minimum(1, ceiling / (abs(dry).max(0) + 1e-9))
    gain = minimum_filter1d(gain, size=131)
    gain = uniform_filter1d(uniform_filter1d(gain, size=65), size=65)
    low_pass = signal.firwin(401, 16000, window=("kaiser", 9), fs=SR)
    return signal.oaconvolve(dry * gain, low_pass[None], "same", axes=1)


dry = scene()
out = record(dry)
dump_mix(out)
```